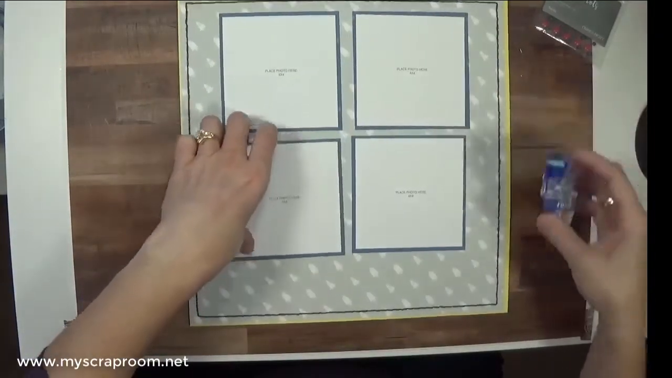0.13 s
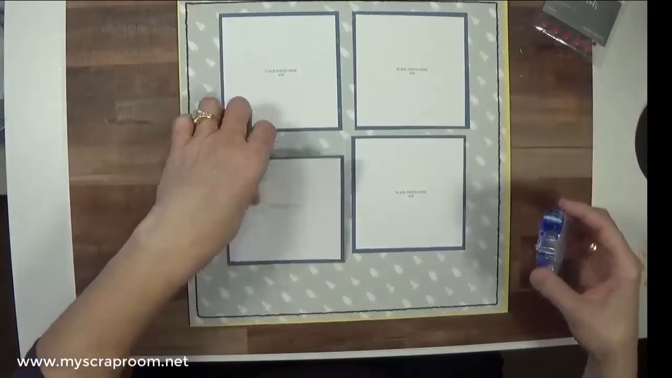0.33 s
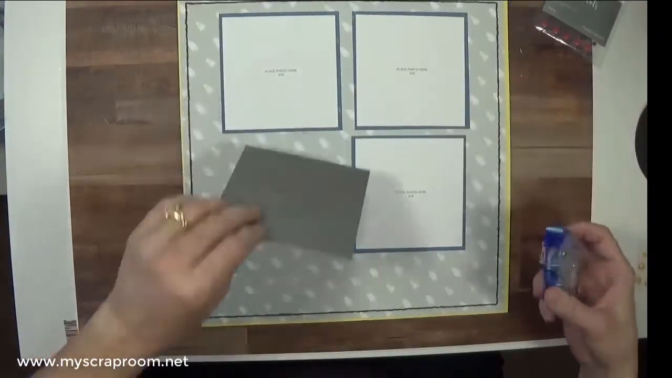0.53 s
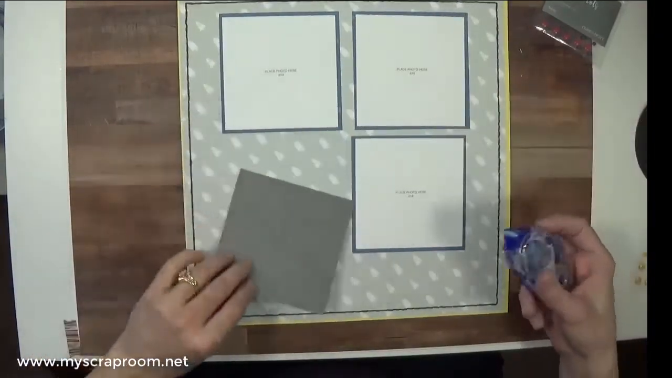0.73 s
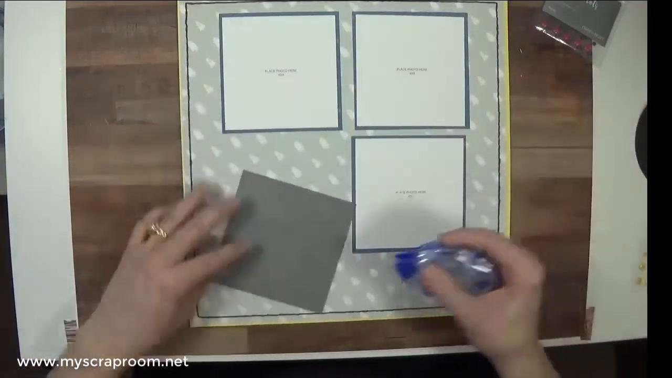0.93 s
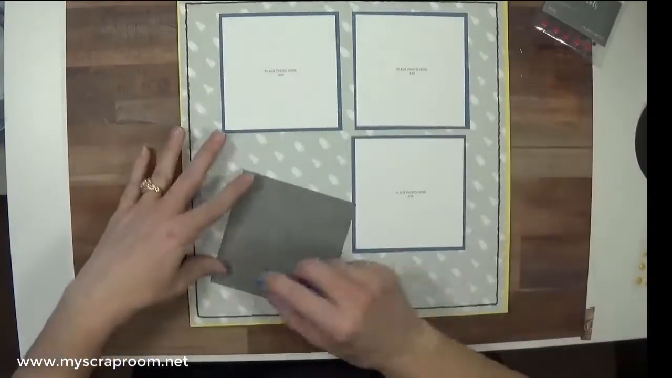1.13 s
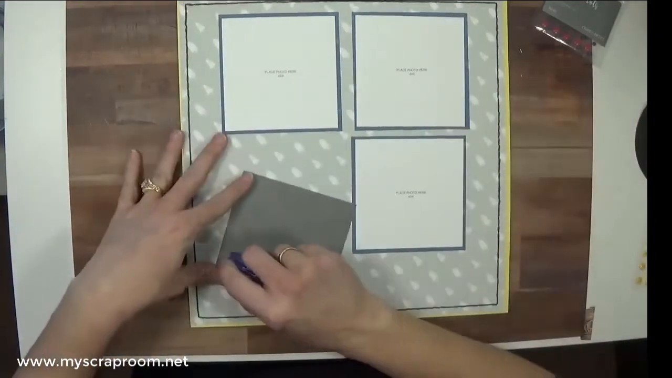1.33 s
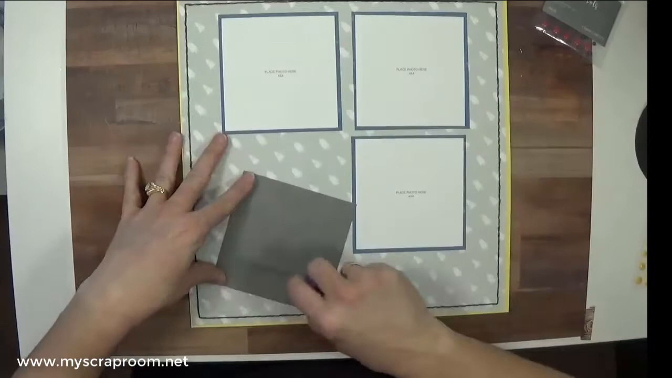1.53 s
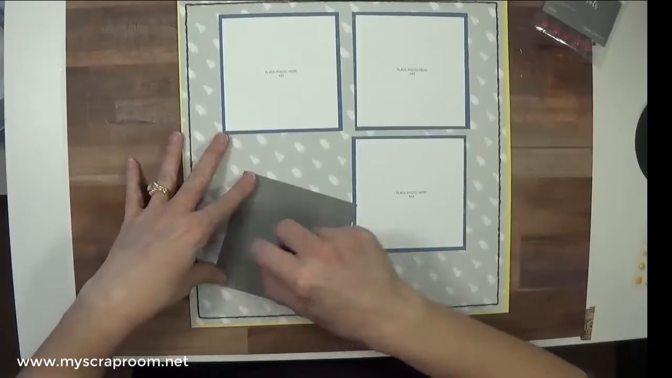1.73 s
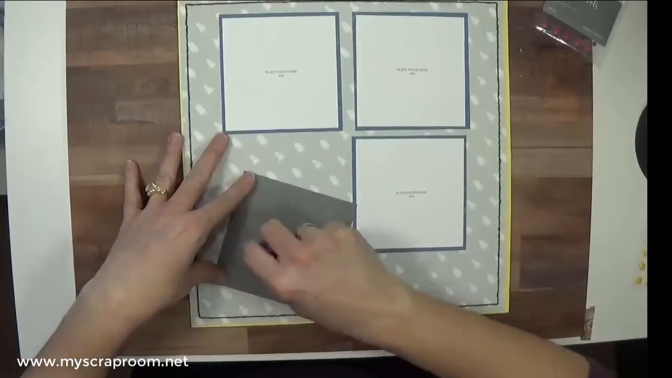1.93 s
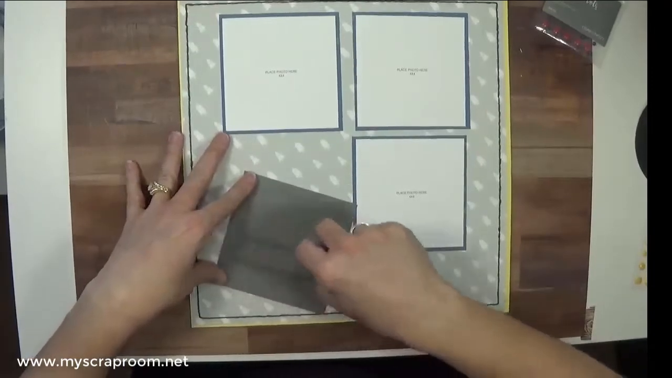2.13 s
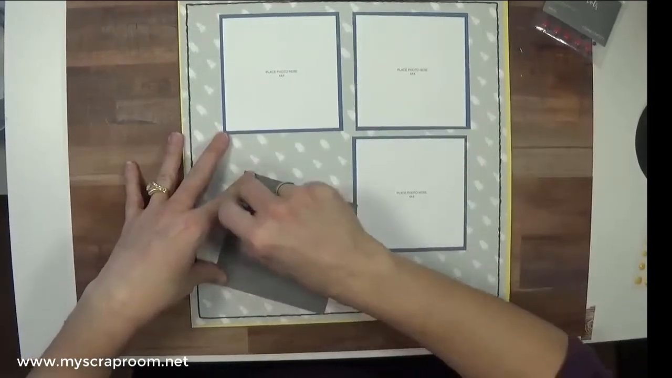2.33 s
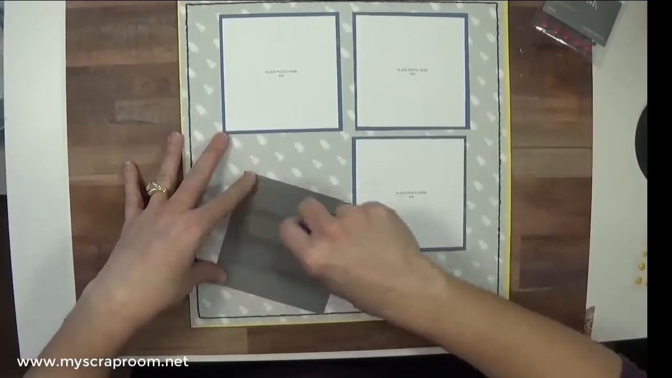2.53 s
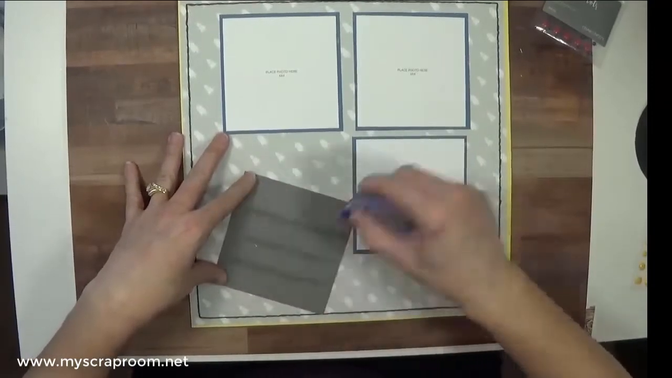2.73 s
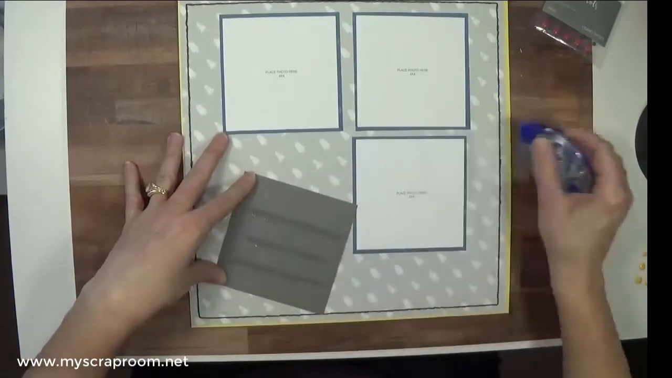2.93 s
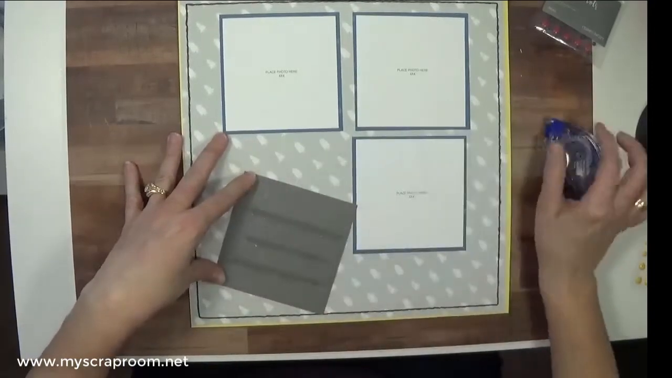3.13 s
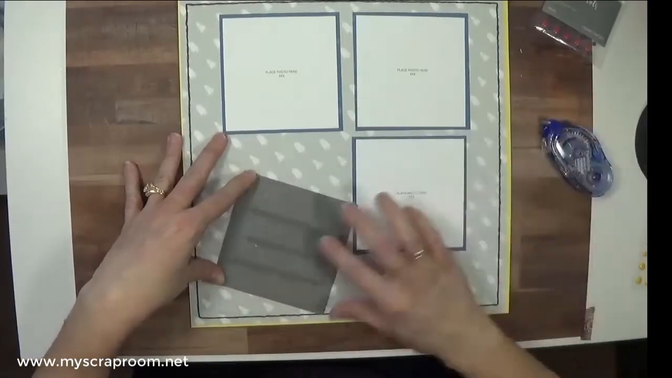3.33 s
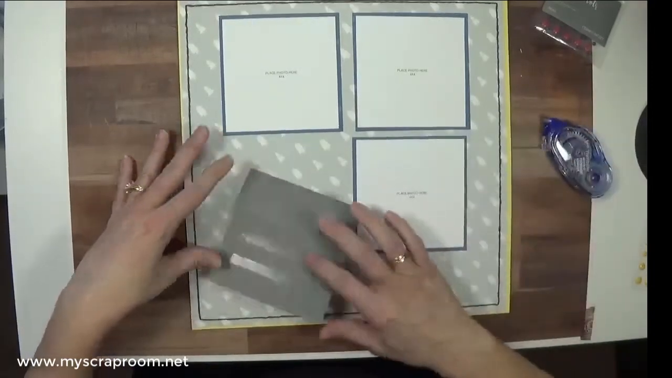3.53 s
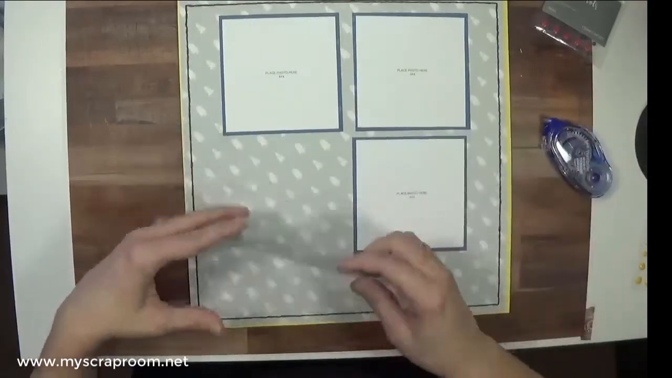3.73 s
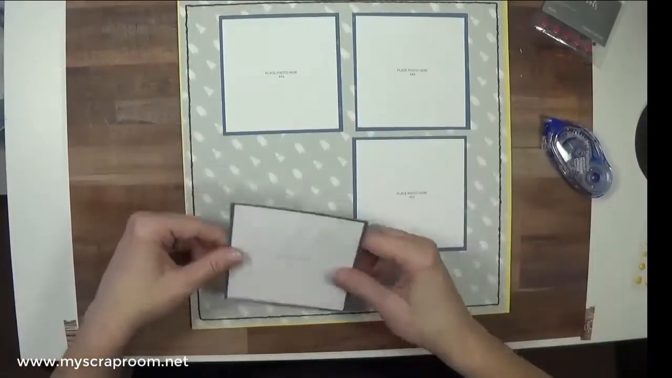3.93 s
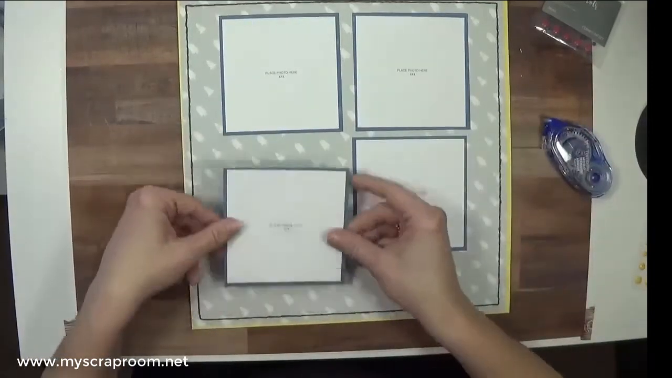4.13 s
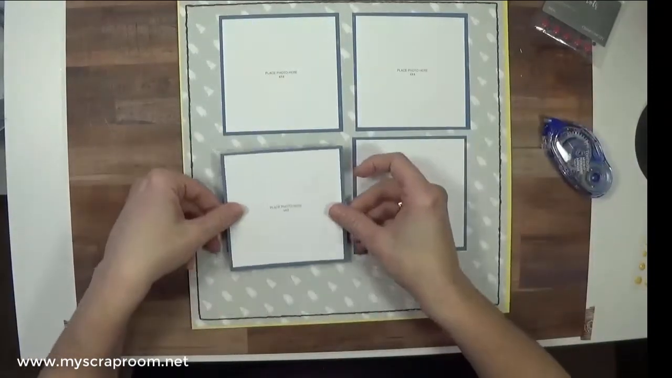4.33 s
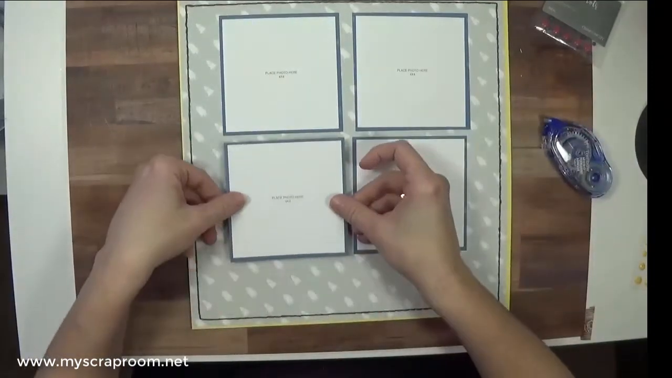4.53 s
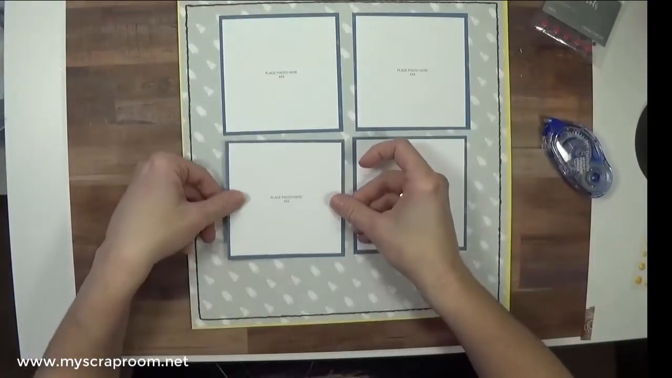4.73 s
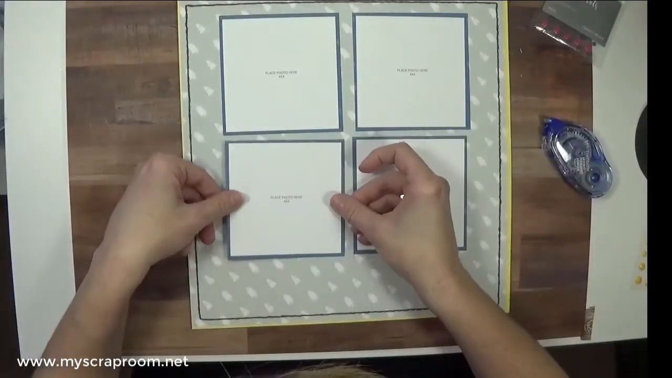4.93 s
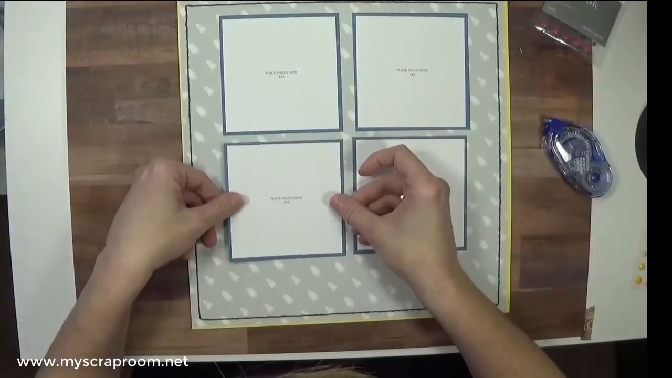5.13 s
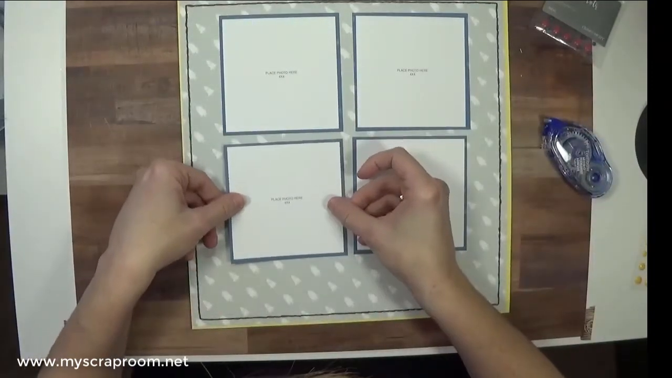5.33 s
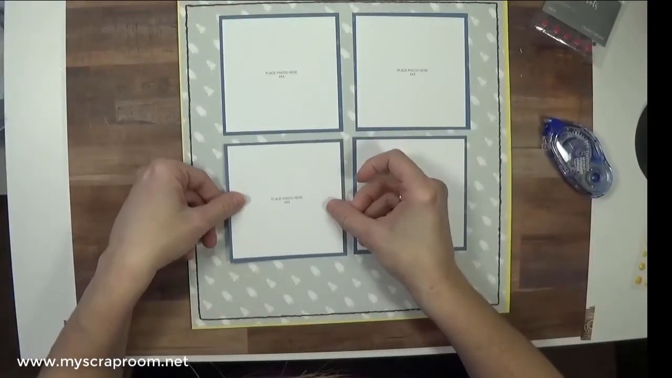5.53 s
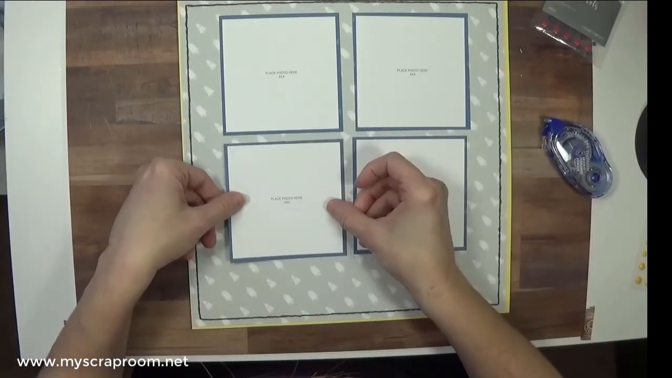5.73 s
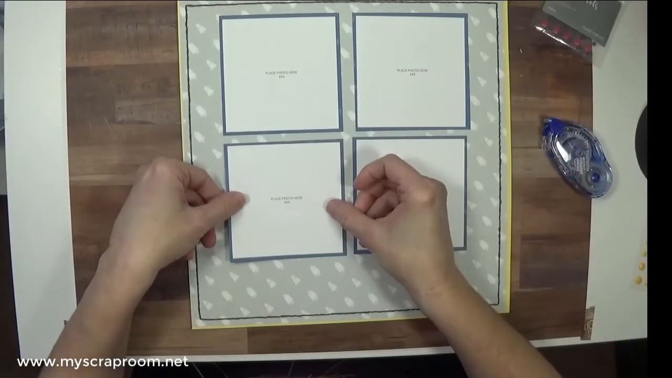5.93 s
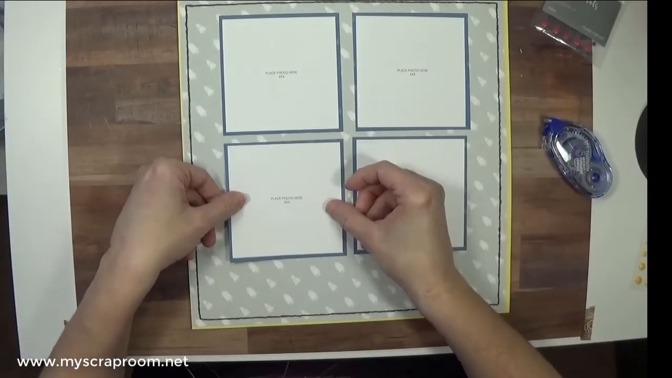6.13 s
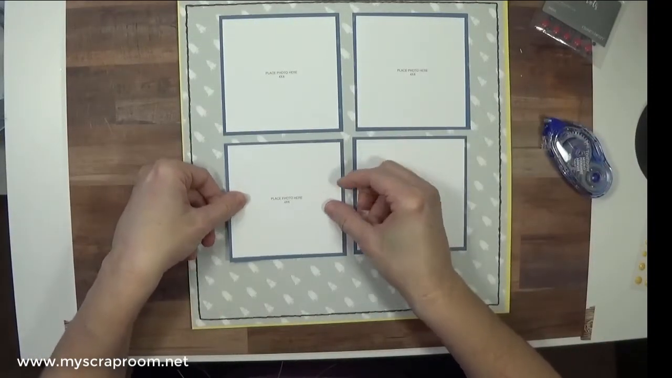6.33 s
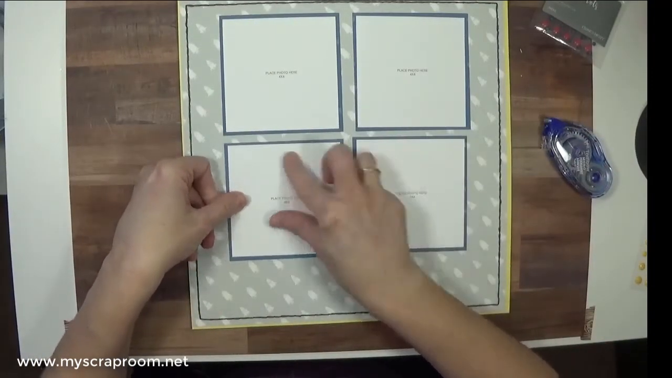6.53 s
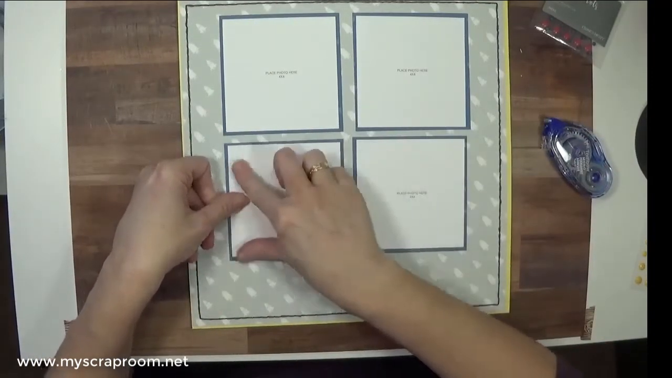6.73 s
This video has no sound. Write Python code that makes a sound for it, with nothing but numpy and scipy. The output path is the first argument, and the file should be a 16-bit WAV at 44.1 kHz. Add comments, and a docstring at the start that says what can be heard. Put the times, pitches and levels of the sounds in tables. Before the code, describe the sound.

Fingers scrape and lift a piece of card, then a hand-held glue runner knocks down and zips across it three times, with gritty teeth clicks and sticky crackle. Its hollow plastic case drops on the wooden desk and rocks to rest. Light card handling follows, then quiet, a sharp snap and smoothing strokes. Close stereo microphone, short room reflections, faint hiss and low hum.

```python
"""Three rasping strokes of a hand-held tape runner over a card on a wooden desk, each begun by a knock.
The plastic case is then dropped and rocks to rest; fingers slide, flip and snap the card in a quiet room.
Ratchet teeth and peeling glue drive the modes of the case, and blows and pressure those of the desk;
friction is shaped noise, and card edges are noise scratches with a short ring.
Echoes, room hiss, a hum and a dull whoosh surround them."""
import sys
import numpy as np
from scipy import signal
from scipy.fft import rfft, irfft
from scipy.io import wavfile
from scipy.ndimage import uniform_filter1d

SR = 44100
rng = np.random.default_rng(int(sys.argv[2]) if len(sys.argv) > 2 else 0)


def linear_from_db(decibels):
    """Turn decibels (scalar or array-like) into linear amplitude factors; 0 gives 1."""
    return 10 ** (np.asarray(decibels, float) / 20)


def transcribe(signal):
    """Save signal, clipped to [-1, 1], as a 16-bit WAV file at the path in sys.argv[1]."""
    frames = np.atleast_2d(signal).T
    limited = np.clip(frames, -1, 1)
    pcm = np.round(limited * 32767).astype(np.int16)
    wavfile.write(sys.argv[1], SR, pcm)


N = 302967
T = np.arange(N) / SR

# strokes of the runner: start_s, length_s, level_db at full speed,
# then the lifts of the shell mode and of the gear mode when slow: shell_lift_db, gear_lift_db
STROKES = [(1.376, 0.23, -20, 18, 8.3), (1.875, 0.22, -19, 12, 2.8), (2.389, .238, -19, 26, 3.7)]
# modes of the plastic case: mode_hz, nominal_width_hz, strength_db (case() broadens and weights them)
CASE_MODES = [(1090, 54, -11.5), (1558, 240, -3.5), (1850, 48, -11.5), (2230, 180, -10), (2530, 68, -4),
              (2890, 41, -4), (3327, 75, -7.5), (3700, 70, -4.5), (4169, 220, 5), (4600, 350, -9),
              (4960, 220, -8), (6584, 110, -12), (8250, 180, -4.5), (9070, 160, -10), (10590, 43, -14.5)]


def strokes():
    """Impulsive excitation: ratchet teeth and crackling glue drive the case, faster in mid-stroke."""
    shell_hz, gear_hz = 1670, 4220
    attack_s, release_s, edge_level_db = 0.0071, 0.016, -10
    slow_level_db = -5  # slow tape is softer, a little brighter, and rings the case more
    slow_tilt_db, fast_tilt_db, fast_lift_db = -1, -2.1, -1.5  # tilts in dB per octave
    loudest_share = 0.629  # share of the stroke at which it is loudest
    slow_teeth_hz, fast_teeth_hz, gap_scatter = 80, 190, 0.15
    rasp = np.zeros(N)
    modes = np.array([hz for hz, width, db in CASE_MODES] + [3000])[:, None]  # last row: bare crack
    drift = np.array([walk(30.0) for mode in modes])  # the grip changes which modes sound
    for start, length, top_db, *slow_lifts_db in STROKES:
        stop = start + length
        end = stop + release_s
        effort = np.interp(T, [start, start + loudest_share * length, stop], [0, 1, 0])
        edge_db = np.interp(T, [start, start + attack_s, stop, end], [edge_level_db, 0, 0, edge_level_db])
        level_db = top_db + slow_level_db * (1 - effort) + edge_db
        tilt_db = slow_tilt_db + (fast_tilt_db - slow_tilt_db) * effort
        shell_db, gear_db = (lift + (fast_lift_db - lift) * effort for lift in slow_lifts_db)
        speed = np.sin(np.pi * np.clip((T - start) / (end - start), 0, 1)) ** 1.5

        teeth = np.zeros((len(modes), N))
        tooth_s = start + 0.0022
        for gap, size, *colour in rng.standard_normal((80, len(modes) + 2)):
            if tooth_s < end:
                gains = linear_from_db(1.0 * size + 3.0 * np.array(colour))[:, None]  # each tooth has its own colour
                add(teeth, tooth_s, gains * burst(2.2, rise=1.43))
            teeth_hz = slow_teeth_hz + (fast_teeth_hz - slow_teeth_hz) * speed[min(int(tooth_s * SR), N - 1)]
            tooth_s += np.exp(gap_scatter * gap) / teeth_hz

        peel = linear_from_db(-19 + 1.9 * walk(700) + 7 * speed) * rng.standard_normal(N)
        span = slice(int(start * SR), int(end * SR))
        grip = linear_from_db(tilt_db[span] * np.log2(modes / 3000) + 3.5 * drift[:, span])
        grip *= favour(modes, shell_hz, shell_db[span], octaves=0.12)
        grip *= favour(modes, gear_hz, gear_db[span], octaves=0.1)
        sound = case(grip * (teeth + peel)[:, span], broad_db=-9.0)
        running_rms = np.sqrt(np.abs(uniform_filter1d(sound ** 2, size=2600)) + 1e-12)
        rasp[span] += linear_from_db(level_db[span]) * sound / running_rms
    return rasp


def knocks():
    """Modal excitation by impact: each knock drives most the mode of the case nearest the struck spot."""
    # knocks of the case: time_s, nominal_peak_db, tilt_db per octave, favoured_hz, contact_ms
    blows = [(1.305, -25, -4.5, 4200, 3.1), (1.31, -15, -1, 1485, 1.4), (1.328, -36, -6, 1520, 2.25),
             (1.358, -26.5, 11, 4160, 2.5), (1.379, -9, 2, 4200, 2.7), (1.653, -22.5, 9.5, 3630, 1.8),
             (1.662, -23.5, 6, 7800, 1.5), (1.818, -9, -2, 1067, 7.3), (1.825, -17.5, -4, 4380, 6.2),
             (1.829, -1, 0.5, 4180, 0.98), (2.093, -6.5, -4.5, 4200, 1.72), (2.156, -17.5, 2, 8310, 1.35),
             (2.22, -32.5, 3.5, 3760, 1.6), (2.323, -13, -2.5, 1070, 6.7), (2.332, -2.5, -1.5, 1090, 2.14),
             (2.335, -14.5, -1.5, 1892, 3.6), (2.648, -13, -1, 4400, 6.1), (2.701, -29, -1, 3620, 3.5),
             (2.799, -38, -3, 1670, 3.4), (2.866, -28, -23, 1720, 1.4), (3, -7, 1, 5250, 4.3),
             (3.008, -18, -9.5, 3840, 3.9), (3.092, -7.5, -8.5, 4620, 2), (3.097, -6.5, -2.5, 2720, 2.2),
             (3.101, -4.5, -1, 4600, 3.3), (3.11, -8, -4, 1910, 3.3), (3.115, -6, -5, 1550, 3.7),
             (3.123, -9, -5.5, 1750, 0.86), (3.148, -28.5, 7.5, 9350, 4.8), (3.154, -15, -9.5, 1740, 2.5),
             (3.163, -9, -1, 4000, 3.1), (3.172, -18.5, 0, 4110, 2.3), (3.215, -21.5, 1.5, 1850, 8.5),
             (3.223, -25, -23, 4170, 6.4), (3.231, -20, -4.5, 4200, 7.9), (3.254, -18, -12, 2900, 2.3),
             (3.26, -19, -4.5, 4190, 2.26), (3.299, -30.5, -8.5, 4120, 3.5), (3.314, -25, -3, 4250, 3.8),
             (3.368, -29.5, -3, 2940, 3.8), (3.385, -25, -1.5, 4200, 4.2), (3.401, -29.5, -1, 4310, 4.3)]
    out = np.zeros(N)
    modes = np.array([hz for hz, width, db in CASE_MODES] + [1])  # last row: bare crack, not favoured
    for time_s, peak_db, tilt_db, hz, contact_ms in blows:
        gains = linear_from_db(3.0 * rng.standard_normal(len(modes)))
        gains *= favour(modes, hz, boost_db=13, octaves=0.08)
        scratch = np.pad(burst(contact_ms), (256, 768))  # margins for the filters
        sound = tilt(case(gains[:, None] * scratch, broad_db=-8), tilt_db)
        add(out, time_s - 0.0005 - 256 / SR, peak(sound, peak_db, contact_ms))
    return out


def case(push, broad_db):
    """Modal superposition: row k of the push drives mode k; the last row is the bare broadband crack."""
    # colour of the bare crack: frequency_hz, density_db
    crack_colour = [(240, -73), (400, -22), (866, -5.5), (983, -6), (1560, 9), (3480, -1.5), (4240, -5.5),
                    (6740, 10), (10600, 4.5), (11500, -25.5), (15000, -55), (22000, -120)]
    modes = 0
    for drive, (hz, width, db) in zip(push, CASE_MODES):
        modes = modes + linear_from_db(db) * np.sqrt(300 / width) * ring(drive, hz, 1.44 * width + 50)
    no_bass = signal.butter(2, 750, "high", fs=SR)  # so small a body radiates no bass
    return signal.lfilter(*no_bass, modes) + linear_from_db(broad_db) * shape(push[-1], crack_colour)


def thumps():
    """Impulse response of a struck plate: rounded force pulses set the desk top ringing."""
    # blows to the desk top: time_s, peak_db, favoured_hz, contact_ms
    blows = [(0.065, -43, 220, 2.3), (1.302, -28.5, 253, 2.5), (1.818, -17.5, 254, 2.4),
             (2.322, -18.5, 250, 4.22), (3.0, -37, 327, 1.5), (3.094, -30, 320, 1.15),
             (3.1, -20.5, 650, 0.42), (3.168, -30.5, 304, 3), (3.441, -48, 300, 2.1),
             (3.911, -47, 292.4, 1.6), (4.489, -39.5, 284, 0.58), (6.375, -39, 267, 1.55)]
    out = np.zeros(N)
    for time_s, peak_db, hz, contact_ms in blows:
        phase = np.arange(8192) / SR * 1000 / max(contact_ms, 0.2)
        force = np.sin(np.pi * np.minimum(phase, 1)) ** 2
        sound = desk(force, hz)
        add(out, time_s, linear_from_db(peak_db) * sound / np.abs(sound).max())
    return out


def desk(push, favoured_hz):
    """Modal superposition: damped modes of the desk top, excited most near one of them."""
    # modes of the desk top: mode_hz, strength_db (weighted below by decay), t60_s
    desk_modes = [(162, -12.5, 0.45), (198, -7, 0.086), (253.3, 3, 0.088), (297.4, -5, 0.34),
                  (650, 3.5, 0.018), (1070, -9.5, 0.0807)]
    out = 0
    for hz, db, t60 in desk_modes:
        gain = linear_from_db(db) * favour(hz, favoured_hz, boost_db=13.5, octaves=0.088) * np.sqrt(100 * t60)
        out = out + gain * ring(push, hz, np.log(1000) / np.pi / t60)  # bandwidth follows from t60
    return out


def tremble():
    """Forced vibration: pressing and rocking shake the desk top and, lower in pitch, its legs."""
    # the hand presses through each stroke: top_db and legs_db at the end of the stroke, favoured_hz
    presses = [(-47.5, -66, 290), (-48, -52.5, 249), (-47.5, -53, 180)]
    # jolts that leave the desk trembling: time_s, top_db, legs_db, favoured_hz, top_t60_s
    jolts = [(1.303, -39, -63, 260, 0.236), (1.821, -30.5, -55.5, 252, 0.19),
             (2.326, -29.5, -51.5, 236.9, 0.13), (2.999, -37.5, -81, 302, 0.15),
             (3.098, -36, -58, 295.3, 0.23), (3.177, -41, -79, 301.5, 0.49), (3.319, -54, -77, 300, .6),
             (3.43, -66, -69.5, 300, 0.45)]
    press_rise_db, press_t60_s, lead_s = 7.5, 0.16, 0.03
    legs_slower = 2.8  # the legs ring on so many times longer than the top
    out = np.zeros(N)
    legs = unit(ring(ring(ring(rng.standard_normal(N), 48, 35), 48, 50), 50, 60))
    pressure = ring(rng.standard_normal(N), 220, 170)
    broad = unit(ring(pressure, 195, 100))
    handled = pressure[SR:4 * SR]  # the desk modes are driven from 1 to 4 s

    def top(hz):
        """Forced response of the desk top near one mode, over a broad rumble."""
        return np.pad(unit(desk(handled, hz)), (SR, N - 4 * SR)) + 0.6 * broad

    for (start, length, *_), (top_db, legs_db, hz) in zip(STROKES, presses):
        first, end = start - lead_s, start + length
        last = end + press_t60_s
        lean_db = np.interp(T, [first, start, end, last], [-60, -press_rise_db, 0, -60])
        lean = linear_from_db(lean_db + 2.1 * walk(23)) * (T > first) * (T < last)
        out += lean * (linear_from_db(top_db) * top(hz) + linear_from_db(legs_db) * legs)
    for time_s, top_db, legs_db, hz, t60 in jolts:
        out += linear_from_db(top_db) * dying(time_s, t60) * top(hz)
        out += linear_from_db(legs_db) * dying(time_s, legs_slower * t60) * legs
    return out


def ticks():
    """Stick and release: card edges catch and let go with a scratch and a short ring at one pitch."""
    # ticks and snaps of the card: time_s, nominal_peak_db, centre_hz, width_ratio to the centre, ring_db
    snaps = [(0.038, -33, 5430, 3.7, -1), (0.271, -32, 4440, 1.8, 0), (0.275, -34, 1100, 1.8, 17),
             (0.458, -35.5, 1740, 1.8, 12), (0.536, -30, 1610, 0.56, 10), (0.572, -18.5, 1670, 1.3, 1),
             (0.578, -25, 1572, 1.5, 12), (0.671, -31, 8040, 2.1, -8.5), (0.704, -24.5, 2160, 3.8, 14),
             (0.762, -23, 9870, 1.8, 11), (0.771, -29.5, 2400, 0.96, 11), (0.913, -33, 1625, 1.6, 13),
             (0.941, -34.5, 1568, 4.7, 16), (0.968, -41, 1550, 1.5, 8), (1.194, -32, 1090, 10.8, 3),
             (3.522, -34.5, 2230, 2.1, 2.5), (3.567, -44, 1830, 1.8, 3), (3.636, -39.5, 866, 1.63, 13),
             (3.675, -45.5, 1590, 2.1, 7), (3.748, -39, 885, 3.6, 15.5), (3.911, -17.5, 1460, 6.6, 7),
             (3.915, -18.5, 1051, 8, 8), (3.951, -26, 1020, 5.4, 13), (4.314, -31.5, 4220, 2.3, 2),
             (4.321, -31.5, 2400, 1.6, 14), (4.488, -39, 900, 0.79, 10), (4.5, -47, 803, 1.5, 3),
             (4.655, -23.5, 3600, 1.4, 2), (4.684, -38.5, 2750, 2.3, 6), (6.376, -8, 4600, 0.9, -1),
             (6.376, -25.5, 757, 1.4, 6), (6.395, -35, 8350, 2, 6.5), (6.403, -37.5, 6630, 1.8, 9),
             (6.631, -31, 4000, 1.8, 2), (6.706, -37, 4260, 2.3, -2.5)]
    contact_ms = 2.09
    out = np.zeros(N)
    for time_s, peak_db, hz, width_ratio, ring_db in snaps:
        scratch = burst(contact_ms)
        width = min(hz * max(width_ratio, 0.1), SR / 3)
        wide = ring(ring(scratch, hz, width), hz, min(5.4 * width, SR / 3))
        sound = wide + linear_from_db(ring_db) * ring(wide, hz, hz / 9) + 0.047 * scratch
        add(out, time_s - 0.0005, peak(sound, peak_db, contact_ms))
    return out


def slide():
    """Friction noise: a fine grainy hiss, and a duller scrape that sounds the resonances of the card."""
    # colour of the friction hiss: frequency_hz, density_db
    hiss_colour = [(880, -36), (1500, -23.5), (2380, -22.5), (2630, -8.5), (4700, -0.5), (6780, -1),
                   (9950, 2), (11200, -7.5), (11500, -27), (15000, -52), (22000, -120)]
    # resonances of the card: mode_hz, nominal_width_hz (broadened below), level_db
    card_modes = [(1160, 130, -20.5), (1750, 690, 5), (2400, 520, 0.5), (3600, 150, -4), (4200, 200, -8.5),
                  (5340, 200, -5.5)]
    # faint rustle of the moving hands: time_s, hiss_db
    rustle = [(0, -62.5), (.2, -55.5), (.6, -62.5), (.85, -61), (1.0, -66.5), (1.7, -59.5), (2.25, -58.5),
              (2.75, -62), (2.94, -64.5), (3.55, -63.5), (3.7, -65), (4.25, -67.5), (4.45, -72.5),
              (4.7, -63), (4.86, -77)]
    # fingers and card slide, and the dropped case scrapes: loudest_s, swell_s, fade_s, hiss_db, scrape_db
    rubs = [(.074, .044, 0.045, -42, -58), (.297, 0.029, 0.13, -43.5, -54.5), (.5, 0.2, 0.15, -65, -53.5),
            (.708, 0.046, .022, -50, -50.5), (.772, 0.055, .018, -43.5, -56),
            (1.11, 0.065, 0.064, -61, -58.5), (1.25, 0.07, 0.082, -52.5, -57.5),
            (2.321, 0.008, .004, -66, -48), (3.155, .03, 0.019, -34, -29.5),
            (3.42, 0.039, 0.14, -48, -57.5), (3.638, 0.017, 0.0086, -57, -59),
            (3.907, 0.051, 0.066, -52.5, -53.5), (4.03, 0.063, 0.032, -51.5, -51.5),
            (4.2, 0.074, .06, -68, -66), (4.316, 0.02, 0.0056, -64, -50), (4.652, 0.042, 0.035, -64, -63),
            (4.775, .065, .035, -70, -81), (6.371, 0.02, 0.0072, -54.5, -60),
            (6.6, 0.18, 0.075, -46.5, -62.5), (6.639, .013, 0.022, -45, -51),
            (6.83, 0.14, 0.164, -46.5, -63)]
    # card and case scuff to rest after a blow or a stroke: time_s, hiss_db, scrape_db, t60_s
    settles = [(1.313, -54, -35.5, 0.28), (1.622, -43, -57, 0.3), (1.839, -40.5, -34, 0.317),
               (2.107, -38, -40, .12), (2.159, -44, -47, 0.114), (2.342, -40, -34, 0.28),
               (2.661, -40, -46.5, 0.22), (3.016, -37, -38, 0.22), (3.171, -35, -34, .15),
               (3.232, -52, -47, 0.54), (3.32, -55, -45, 0.084), (3.951, -38, -51.5, 0.035),
               (4.324, -58, -59.5, 0.085), (6.379, -42, -47, 0.114), (6.665, -55.5, -64, .4)]
    edge_db, edge_s = -10, 0.0078  # a rub is this much softer at its ends, then stops
    rustle_scrape_db = -4  # scrape relative to hiss

    grain = linear_from_db(2.0 * walk(440) + 0.97 * walk(60))
    hiss = unit(shape(grain * rng.standard_normal(N), hiss_colour))
    noise = linear_from_db(2.5 * walk(150)) * rng.standard_normal(N)
    tones = np.zeros(N)
    for hz, width, db in card_modes:
        tones += linear_from_db(db + 3.5 * walk(9)) * unit(ring(noise, hz, min(width + 80, hz)))
    dull = unit(ring(ring(noise, 1300, 2000), 1750, 2600))
    scrape = unit(dull + 1.6 * unit(tones))

    # powers of hiss and scrape (two rows) add up
    rustling = linear_from_db(curve(rustle)[0] + 1.5 * walk(7.9)) * (T < rustle[-1][0])
    power = (rustling * linear_from_db(np.array([[0], [rustle_scrape_db]]))) ** 2
    for top, rise, fall, *levels_db in rubs:
        start, end = top - rise, top + fall
        swell = np.interp(T, [start - edge_s, start, top, end, end + edge_s],
                          [0, linear_from_db(edge_db), 1, linear_from_db(edge_db), 0])
        power += (linear_from_db(np.array(levels_db))[:, None] * swell) ** 2
    for time_s, *levels_db, t60 in settles:
        power += (linear_from_db(np.array(levels_db))[:, None] * dying(time_s, t60)) ** 2
    return np.sum(np.sqrt(power) * [hiss, scrape], axis=0)


def singing():
    """Resonance: dragged card edges sing faintly at one pitch; after the second stroke the case rings on."""
    # sung notes: start_s, end_s, pitch_hz, level_db at mid-note
    notes = [(0.155, 0.284, 3500, -61), (0.386, 0.576, 1750, -60.5), (.68, .8, 2400, -57),
             (.79, 0.935, 3600, -59.5), (1.08, 1.3, 3600, -67.5), (2.107, 2.161, 1590, -51.5),
             (4.14, 4.25, 2108, -71), (4.563, 4.663, 2400, -63.5)]
    sharpness = 14  # pitch over bandwidth
    out = np.zeros(N)
    noise = linear_from_db(2.5 * walk(40)) * rng.standard_normal(N)
    for start, end, hz, db in notes:
        swell = np.sqrt(np.maximum(1 - (2 * (T - start) / (end - start) - 1) ** 2, 0))
        tone = ring(ring(noise, hz, hz / sharpness), hz, 3 * hz / sharpness)
        out += linear_from_db(db) * swell * unit(tone)
    return out


def spread(x):
    """Decorrelation: nearby reflections reach the two microphones differently."""
    # side level before a further 6 dB cut: frequency_hz, side_minus_mid_db
    side_colour = [(30, -2.5), (60, -3), (110, -4), (190, -5), (350, -12), (630, -11), (1130, -16),
                   (2030, -5), (3640, -10), (6550, -8.5), (11800, -21.5)]
    time_ms = np.arange(1024) / SR * 1000
    glints = rng.standard_normal(1024) * np.exp(-time_ms / 5.3)
    side = signal.fftconvolve(x, glints / np.sqrt(np.sum(glints ** 2)))[:N]
    return air([0, linear_from_db(-6.0) * shape(side, side_colour)])


def echoes(x):
    """Reverberation: walls and shelves answer with a short tail, longer in the low range, unlike in each ear."""
    wet_db, t60, dull_t60 = -17, 0.1, 0.3  # decay times in s
    t = np.arange(SR // 2) / SR
    noise = rng.standard_normal((2, len(t))) * np.minimum(t / 0.0031, 1)
    low = ring(noise, 1200, 2100)
    tail = noise * linear_from_db(-60 * t / t60) + 2.5 * low * linear_from_db(-60 * t / dull_t60)
    tail = air(tail * [[1], [0.7]]) / np.sqrt(np.sum(tail[0] ** 2))
    return linear_from_db(wet_db) * signal.fftconvolve(x[None], tail, axes=1)[:, :N]


def room_tone():
    """Stationary noise and a tone: coloured hiss, a wavering hum and a dull whoosh that swells and fades."""
    # colour of the room hiss: frequency_hz, density_db
    room_colour = [(15, -45.5), (25, -26), (38, -21), (70, -14.5), (95, -15), (123, -5), (167, -17),
                   (301, -21), (360, -25.5), (862, -29), (2800, -32.5), (8030, -35.5), (10600, -38.5),
                   (11500, -53), (15000, -78), (22000, -120)]
    # width of the room hiss: frequency_hz, side_minus_mid_db
    room_side = [(60, -22), (110, -17.5), (190, -10), (350, -2.5), (630, 2.5), (1130, 2.5), (2030, -0.5),
                 (3640, -2), (6550, -7), (11800, -10.5)]
    # hum: pitch_hz, level_db (raised by 3.5 dB below)
    hum_tones = [(118.4, -69.5)]
    # whoosh: time_s, level_db
    whoosh_levels = [(0, -66), (.59, -60), (.82, -66), (1.0, -62.5), (1.2, -58.5), (1.5, -56.5),
                     (2.45, -57), (2.75, -60.5), (3.02, -68), (3.2, -62), (3.58, -66), (4.4, -70),
                     (5, -76.5), (6.87, -73.5)]
    mid, side = shape(rng.standard_normal((2, N)), room_colour)
    hiss = linear_from_db(-61) * air([mid, shape(side, room_side)]) / mid.std()
    hum = np.zeros(N)
    for hz, db in hum_tones:
        cycles = hz * T + 0.071 * walk(12)
        hum += linear_from_db(db + 3.5 + 2.0 * walk(2.4)) * np.sin(2 * np.pi * cycles)
    gust = rng.standard_normal((2, N))
    whoosh = unit(ring(ring(gust, 450, 240), 450, 400) + 0.4 * ring(gust, 670, 230))
    return hiss + hum + linear_from_db(curve(whoosh_levels)[0]) * air(whoosh * [[1], [0.4]])


def burst(ms, rise=1.5):
    """Contact noise: a quick rise, then exponential decay with the contact time."""
    u = np.arange(1024) / SR * 1000 / max(ms, 0.1)
    return (1 - np.exp(-rise * u)) * np.exp(-u) * rng.standard_normal(1024)


def ring(x, hz, width):
    """Simple resonance: a second-order band-pass with gain 1 at its centre."""
    return signal.lfilter(*signal.iirpeak(min(hz, SR / 2.3), hz / width, SR), x)


def favour(modes, hz, boost_db, octaves):
    """Selective excitation: gains that lift the modes near one pitch."""
    return linear_from_db(boost_db * np.exp(-(np.log2(modes / hz) / octaves) ** 2))


def dying(s, t60):
    """Exponential decay: an envelope that starts at s, rises in 2.5 ms and falls 60 dB per t60."""
    late = np.maximum(T - s, 0)
    return np.minimum(late / 0.0025, 1) * linear_from_db(-60 * late / t60)


def peak(sound, db, ms):
    """Energy scaling: give a scratch the energy that yields this peak level on average."""
    return linear_from_db(db) * sound * np.sqrt(ms * SR / 8000 / np.sum(sound ** 2))


def shape(x, points):
    """Linear filtering: colour a sound by (Hz, dB) points over log frequency."""
    hz, db = np.transpose(points)
    f = np.maximum(np.arange(x.shape[-1] // 2 + 1) * SR / x.shape[-1], 1)
    gain = linear_from_db(np.interp(np.log(f), np.log(hz), db))
    return irfft(rfft(x) * gain, x.shape[-1])


def tilt(x, db):
    """Spectral tilt: so many dB per octave about 3 kHz, level beyond 750 Hz and 12 kHz."""
    return shape(x, [(750, -2 * db), (12000, 2 * db)])


def unit(x):
    """Normalisation: scale to rms 1."""
    return x / np.sqrt(np.mean(x ** 2))


def walk(rate):
    """Slow modulation: random levels, rate of them a second, joined by ramps; rms 1."""
    k = int(SR / rate)
    steps = np.repeat(rng.standard_normal(N // k + 1), k)
    return unit(uniform_filter1d(steps, k)[:N])


def curve(rows):
    """Linear interpolation: the columns of a table at every sample."""
    s, *columns = np.transpose(rows)
    return [np.interp(T, s, column) for column in columns]


def add(track, s, sound):
    """Superposition: lay a sound into a track at time s."""
    i = int(s * SR)
    track[..., i:i + sound.shape[-1]] += sound[..., :max(N - i, 0)]


def air(mid_side):
    """Sum and difference: left and right from a middle and a side sound."""
    return mid_side[0] + np.array([[1], [-1]]) * mid_side[1]


def scene():
    """Superposition: the hands' work, panned by frequency, with its reflections over the room tone."""
    # balance of the hands' work: frequency_hz, left_minus_right_db
    balance = [(60, 0.5), (110, -2), (190, -4), (350, 0), (630, -2.5), (1130, -1.5), (2030, 0),
               (3640, -0.5), (6550, 0.5), (11800, -0.5)]
    near = strokes() + knocks() + thumps() + tremble() + ticks() + slide() + singing()
    left, right = ([(hz, sign * db / 2) for hz, db in balance] for sign in (1, -1))
    direct = np.array([shape(near, left), shape(near, right)])
    return direct + spread(near) + echoes(near) + room_tone()


def band_limit(x):
    """A steep low-pass at the top of the band."""
    return signal.sosfilt(signal.butter(12, 12370, fs=SR, output="sos"), x)


def record(dry):
    """Band limiting: an elliptic low-pass cuts the top steeply at 11120 Hz."""
    low_pass = signal.ellip(10, 0.3, 60, 11120, fs=SR, output="sos")
    mix = signal.sosfilt(low_pass, dry)
    return band_limit(mix)


dry = scene()
out = record(dry)
transcribe(out)
```